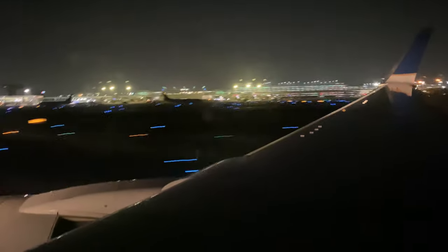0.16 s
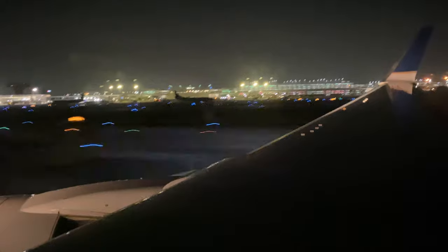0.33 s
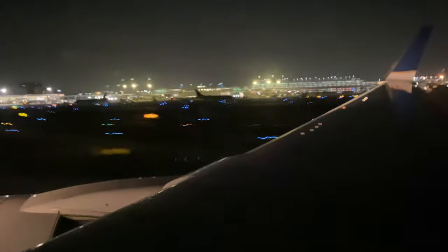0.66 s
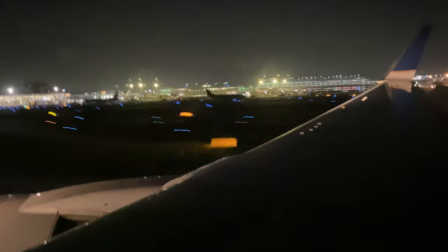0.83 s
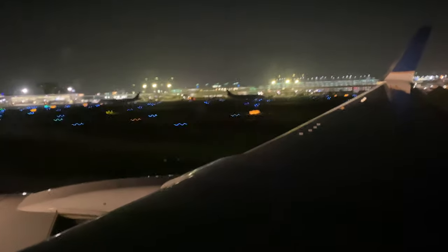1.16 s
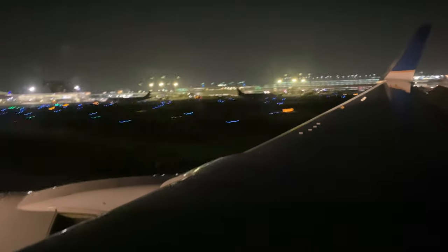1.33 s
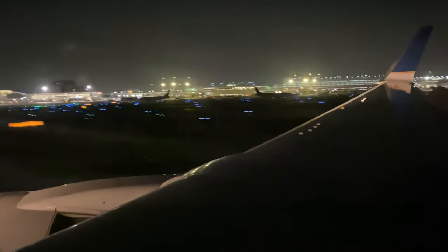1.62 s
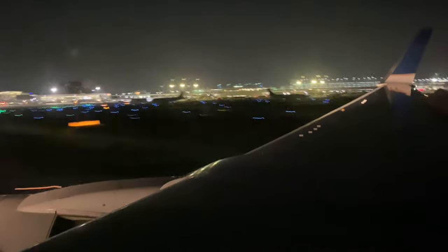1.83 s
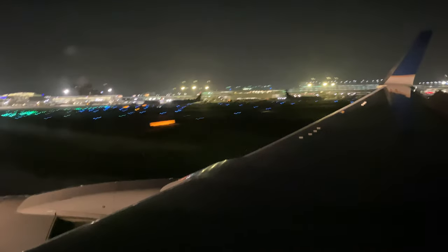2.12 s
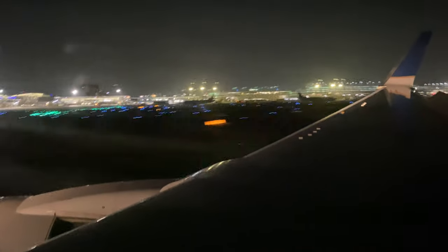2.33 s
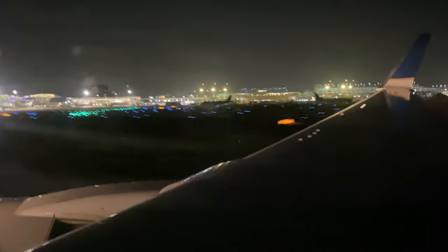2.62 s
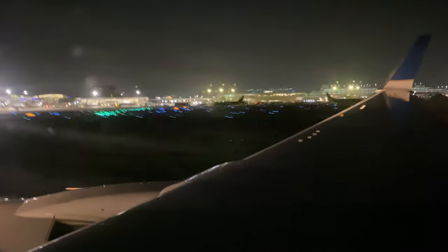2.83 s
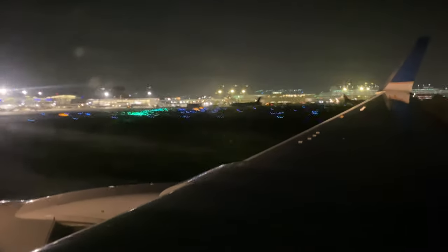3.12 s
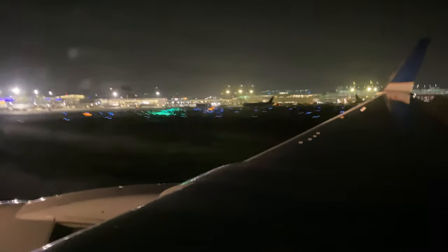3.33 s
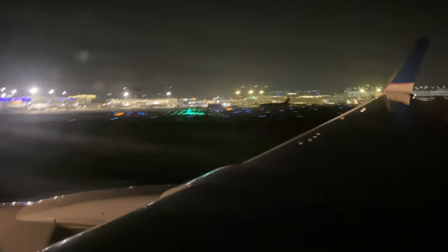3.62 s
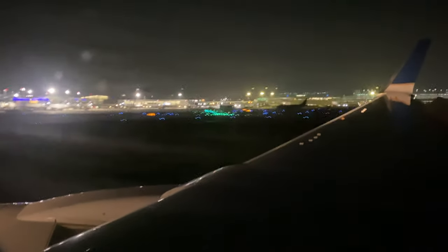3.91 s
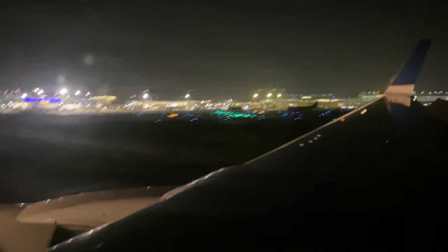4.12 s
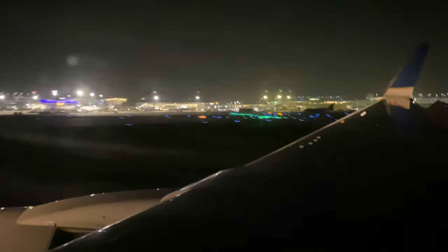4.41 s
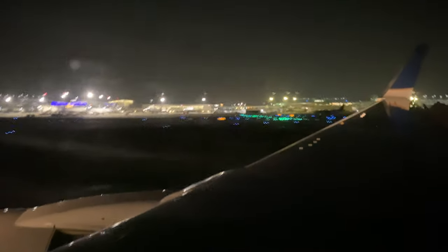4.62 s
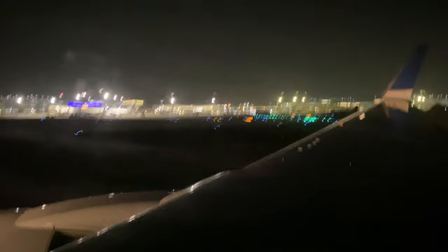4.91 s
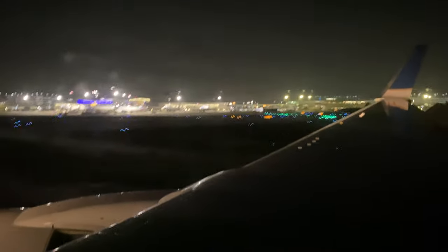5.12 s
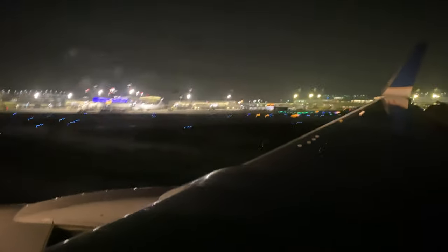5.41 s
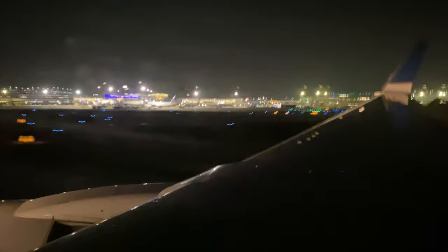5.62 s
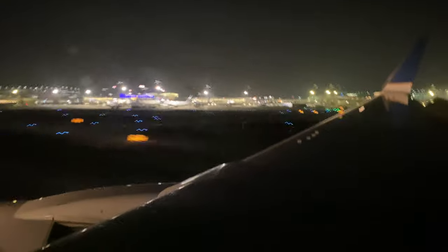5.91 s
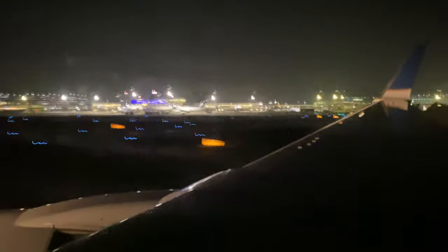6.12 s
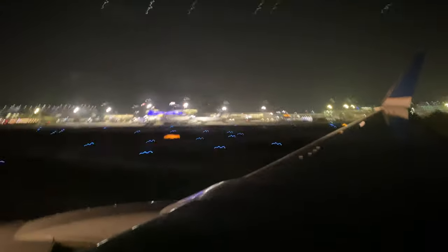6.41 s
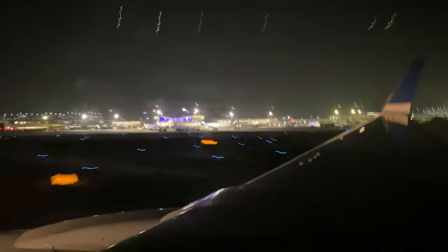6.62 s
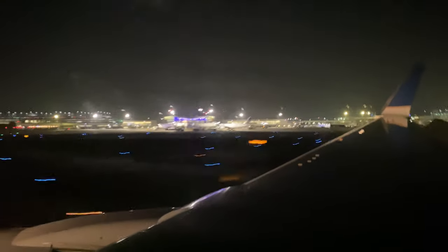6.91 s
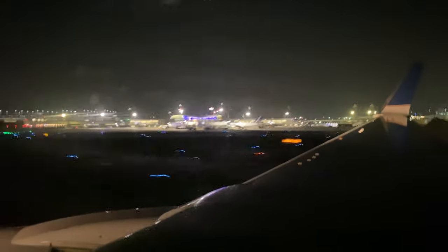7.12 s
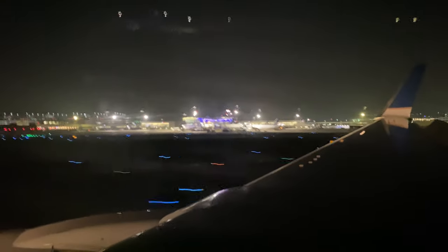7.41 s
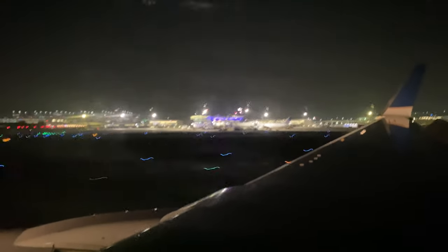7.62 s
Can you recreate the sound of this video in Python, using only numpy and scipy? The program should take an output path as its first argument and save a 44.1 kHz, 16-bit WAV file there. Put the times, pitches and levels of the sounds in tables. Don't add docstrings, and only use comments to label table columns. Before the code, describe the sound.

From a window seat in a passenger jet rolling down the runway at night, a low fuselage boom and wheel rumble run throughout. Reverse thrust swells the roar to a peak after about three seconds, then it eases unevenly. A thin hydraulic whine fades, while panels tick, rattle and knock over airy hiss. A handheld phone in the cabin picks it up in stereo, its bass peaks limited.

```python
import sys
import numpy as np
from scipy import signal
from scipy.fft import rfft, irfft, next_fast_len
from scipy.io import wavfile
from scipy.ndimage import uniform_filter1d, minimum_filter1d

SR = 44100
rng = np.random.default_rng(int(sys.argv[2]) if len(sys.argv) > 2 else 0)


def boost_factor(decibels):
    exponent = np.asarray(decibels, float) / 20
    return 10 ** exponent


def persist_wave(psi):
    counts = np.round(np.clip(psi, -1, 1) * 32767).astype(np.int16)
    wavfile.write(sys.argv[1], SR, np.atleast_2d(counts).T)


N = 341775
TIME_S = np.arange(N) / SR


def on_log_axis(hz, table, column=1):
    table = np.array(table, float)
    return np.interp(np.log(np.maximum(hz, 1)), np.log(table[:, 0]), table[:, column])


def curves(table):
    s, *columns = np.transpose(table)
    return [np.interp(TIME_S, s, column) for column in columns]


def walk(rate):
    hold = int(SR / rate)
    steps = np.repeat(rng.standard_normal(N // hold + 1), hold)
    return 1.3 * uniform_filter1d(uniform_filter1d(steps, hold), hold)[:N]


def ring(x, hz, width_hz):
    y = signal.lfilter(*signal.iirpeak(hz, hz / width_hz, fs=SR), x)
    return y / np.sqrt(np.mean(y ** 2))


def ramp(start_s, travel_s):
    return .5 + .5 * np.tanh(2 * (TIME_S - start_s) / travel_s)


def turbulence(colour, level_db, flicker_db, rate, modes=()):
    size = next_fast_len(N)
    hz = np.fft.rfftfreq(size, 1 / SR)
    lo, hi = colour[0][0], colour[-1][0]
    db = on_log_axis(hz, colour)
    for mode_hz, width_hz, mode_db in modes:
        db = db + mode_db / (1 + (2 * (hz - mode_hz) / width_hz) ** 2)
    below = np.maximum(lo / np.maximum(hz, 1), 1)
    db = db - 30 * np.log2(below * np.maximum(hz / hi, 1))
    spectrum = rfft(rng.standard_normal((2, size))) * boost_factor(db)
    octave = np.log2(np.maximum(hz, 1))
    out = 0
    for centre in np.arange(np.floor(np.log2(lo)) - 1, np.log2(hi) + 1, .5):
        share = np.clip(1 - 2 * abs(octave - centre), 0, 1)
        band = irfft(spectrum * share, size)[:, :N]
        out = out + band * boost_factor(flicker_db * walk(rate))
    return out / np.sqrt(np.mean(out ** 2)) * boost_factor(level_db)


# start_s, thrust_share (0-1)
ENGINE_THRUST = [(0, 0.03), (.3, 0.24), (1.2, 0.39), (2.0, 0.53), (2.7, .75), (3.35, 1), (3.55, 0.67),
                 (4.1, 0.86), (4.5, 0.67), (5.6, 0.65), (6.8, 0.39), (7.75, 0.5)]


def follow(idle_db, thrust_db, reverse_db, slow_db_per_s):
    doors = ramp(start_s=2.12, travel_s=.44)
    return idle_db + thrust_db * curves(ENGINE_THRUST)[0] + reverse_db * doors + slow_db_per_s * TIME_S


# frequency_hz, level_db per Hz
HISS_SPECTRUM = [(5500, -10.5), (6500, -2), (7500, -3), (9500, -4), (12000, -7.5), (13000, -11),
                 (15700, -11)]
# frequency_hz, width_hz, gain_db
VENT_DUCT_MODES = [(6930, 120, 5), (7900, 150, 4), (10600, 250, 3.5), (12200, 300, 1), (13920, 200, 7)]


def hiss(shudder_db):
    level_db = follow(idle_db=-49, thrust_db=1.7, reverse_db=.55, slow_db_per_s=-.53)
    level_db = level_db + shudder_db - 1.7 * ramp(start_s=3.48, travel_s=.05)
    return turbulence(HISS_SPECTRUM, level_db, flicker_db=.6, rate=32, modes=VENT_DUCT_MODES)


# frequency_hz, level_db per Hz
BUZZ_SPECTRUM = [(3200, -5.5), (3800, -2.5), (4400, -1), (4700, -5), (5100, -2), (5800, -5.5),
                 (6300, -10.5), (6900, -20)]


def buzz(shudder_db):
    level_db = follow(idle_db=-48, thrust_db=3.5, reverse_db=1, slow_db_per_s=-.1) + shudder_db
    return turbulence(BUZZ_SPECTRUM, level_db, flicker_db=-.3, rate=21)


def chatter():
    clicks_per_s, spread_db, smear_s = 300, 4, .0037
    size_db = spread_db * rng.exponential(size=(2, N)).clip(0, 4)
    hits = (rng.random((2, N)) < clicks_per_s / SR) * boost_factor(size_db)
    gate = signal.lfilter([1], [1, -np.exp(-1 / (smear_s * SR))], hits)
    band = signal.butter(2, [6000, 15000], "bandpass", fs=SR, output="sos")
    return boost_factor(-64.5 + 3 * walk(4.7)) * signal.sosfilt(band, gate * rng.standard_normal((2, N)))


def trim(events, trim_db, aisle_db=0):
    length = 4096
    t = np.arange(length) / SR
    out = np.zeros((2, N + length))
    for s, db, hz, width_hz, t60_s in events:
        noise = rng.standard_normal((2, length))
        scrape = ring(ring(noise, hz, width_hz), hz, width_hz)
        scrape = scrape / np.std(scrape[:, :SR // 50], axis=1, keepdims=True)
        shape = (1 - np.exp(-t / .0025)) * boost_factor(db + trim_db - 60 * t / t60_s)
        start = int(s * SR)
        out[:, start:start + length] += scrape * shape * boost_factor(np.array([[0], [aisle_db]]))
    return out[:, :N]


# start_s, peak_db
TICK_EVENTS = [(0.1585, -42), (0.7138, -39), (0.7397, -40), (1.0705, -46), (2.5396, -41), (2.9562, -44),
               (3.1547, -41.5), (3.455, -42), (3.8057, -42), (4.0627, -48), (4.6774, -51.5), (5.3482, -46),
               (6.2068, -43.5), (6.7406, -43), (6.917, -47)]


def ticks():
    hz, width_hz, t60_s = 10500, 5000, .031
    return trim([(s, db, hz, width_hz, t60_s) for s, db in TICK_EVENTS], trim_db=5)


# start_s, peak_db
RATTLE_EVENTS = [(0.5165, -35), (0.5877, -38), (0.6903, -32), (0.9054, -35), (1.3399, -34.5), (4.2443, -30),
                 (4.4704, -35), (4.816, -32), (4.969, -31), (5.4494, -35), (5.7219, -30), (6.1674, -32),
                 (6.5503, -35), (6.7434, -29), (7.6244, -30)]


def rattles():
    hz, width_hz, t60_s = 4500, 3100, .07
    return trim([(s, db, hz, width_hz, t60_s) for s, db in RATTLE_EVENTS], trim_db=-7, aisle_db=3)


# start_s, peak_db, centre_hz, width_hz, t60_s
KNOCK_EVENTS = [
    (.516, -27.5, 2600, 1800, .07),
    (.516, -22, 800, 900, .04),
    (.592, -32, 2800, 1500, .06),
    (2.286, -18, 650, 300, .05),
    (3.028, -22.5, 1900, 1700, .1),
    (3.295, -40, 14700, 2500, .02),
    (4.917, -19, 700, 500, .04),
    (7.62, -44, 5950, 200, .06),
]


def knocks():
    return trim(KNOCK_EVENTS, trim_db=0)


# start_s, peak_db, pitch_hz
PING_EVENTS = [
    (1.574, -28, 3280),
    (2.360, -34, 5750),
    (3.028, -15, 1440),
    (3.436, -28.5, 5780),
    (6.43, -38, 5800),
]


def pings():
    rise_s, t60_s = .006, .055
    out = np.zeros(N)
    for s, db, hz in PING_EVENTS:
        t = np.maximum(TIME_S - s, 0)
        shape = (1 - np.exp(-t / rise_s)) ** 2 * boost_factor(db - 60 * t / t60_s)
        out += shape * np.sqrt(2) * np.sin(2 * np.pi * hz * t)
    return out


# start_s, piston_rate_hz, level_db
PUMP_COURSE = [
    (0, 633, 0),
    (.6, 631.5, 0),
    (1.3, 633.5, -1),
    (1.9, 635, .5),
    (2.8, 634, .5),
    (3.3, 630, .5),
    (3.7, 629, -3),
    (4.5, 629, -6),
    (6, 629, -8),
    (7.75, 629, -14),
]
# multiple, left_db, right_db, right_lead_rad
PUMP_HARMONICS = [(2, -49, -50, 2.0), (3, -57, -64, -2.2), (4, -42, -56, .6), (5, -50, -50, -2.9),
                  (6, -61, -60, -.3), (7, -60, -58, -1.2), (8, -53, -59, -2.2), (9, -62, -58, -.8),
                  (14, -66, -66, 2.9), (15, -71, -71, 3.1)]


def pump():
    hz, db = curves(PUMP_COURSE)
    wobble = 1 + .0022 * walk(rate=14) + .007 * walk(rate=80)
    phase = 2 * np.pi * np.cumsum(hz * wobble) / SR
    out = np.zeros((2, N))
    for multiple, left_db, right_db, lead in PUMP_HARMONICS:
        flutter_db = 3.5 * walk(rate=60) + 3 * walk(rate=18)
        swing = np.sqrt(2) * boost_factor(db + np.minimum(flutter_db, 4))
        turn = round(multiple) * phase + 2 * np.pi * rng.random()
        out += swing * np.array([boost_factor(left_db) * np.sin(turn), boost_factor(right_db) * np.sin(turn + lead)])
    return out


# frequency_hz, level_db per Hz
ROAR_SPECTRUM = [(350, 1), (430, -2.5), (490, -4), (620, -3), (660, -6.5), (850, -8.5), (1150, -13),
                 (1300, -14), (1600, -17), (1800, -20), (2700, -22.5), (3100, -27), (3700, -32),
                 (4200, -42)]
# frequency_hz, width_hz, gain_db
WINDOW_GAP_MODES = [(2530, 250, 1), (1290, 110, 1.5)]


def roar(level_db):
    return turbulence(ROAR_SPECTRUM, level_db, flicker_db=.82, rate=10, modes=WINDOW_GAP_MODES)


def panel(roar_db):
    hum = ring(rng.standard_normal(N), hz=738, width_hz=50) * boost_factor(roar_db - 12)
    return np.array([hum, -.7 * hum])


# frequency_hz, level_db per Hz
WHEEL_SPECTRUM = [(95, -12.5), (112, -6), (128, -1.5), (160, -2.5), (195, -6), (220, -19.5)]


def wheels():
    level_db = follow(idle_db=-16.5, thrust_db=1.5, reverse_db=1.85, slow_db_per_s=.12)
    return turbulence(WHEEL_SPECTRUM, level_db, flicker_db=.5, rate=5.8)


# frequency_hz, level_db per Hz
RUMBLE_SPECTRUM = [(170, -21), (200, -3), (232, -4.5), (252, 0), (290, -3), (308, -0.5), (328, -3),
                   (345, -14.5), (415, -11.5), (435, -20.5), (470, -28)]
# frequency_hz, width_hz, gain_db
FLOOR_BEAM_MODE = [(320.2, 12, 3.5)]


def rumble():
    level_db = follow(idle_db=-20.5, thrust_db=4.5, reverse_db=3, slow_db_per_s=.22)
    return turbulence(RUMBLE_SPECTRUM, level_db, flicker_db=.3, rate=7.6, modes=FLOOR_BEAM_MODE)


# frequency_hz, level_db per Hz
BOOM_SPECTRUM = [(12, -48), (20, -28), (33, -17), (39, -12), (55, -4.5), (69, 1), (78, -12), (89, 1),
                 (108, -7), (125, -15)]


def boom():
    level_db = follow(idle_db=-11.5, thrust_db=1.5, reverse_db=-1, slow_db_per_s=-.06)
    return turbulence(BOOM_SPECTRUM, level_db, flicker_db=-.7, rate=10)


# frequency_hz, left_minus_right_db, likeness (0-1), right_lead_rad
PORT_PAIR = [(30, -.1, .993, -.03), (100, 0, .96, -.06), (320, 1, .93, -.15), (460, 0, .4, -.6),
             (720, 5, .3, -.8), (1200, 0, .25, -.6), (2000, 3, .2, -2.2), (2350, 4, .2, -.2),
             (2650, 4.5, .7, -.5), (3300, 4.5, .4, -1.1), (3900, 2.5, .6, -.1), (4900, 4, .25, -.2),
             (5600, 1, .1, -.5), (6400, 0, .3, 0)]


def ports(field):
    treble_from_hz, treble_pure_hz = 6500, 8500
    lag_s, in_phase_hz = .000241, 6990
    edge = SR // 10
    field = np.pad(field, ((0, 0), (edge, edge)), "reflect")
    size = next_fast_len(field.shape[1])
    hz = np.fft.rfftfreq(size, 1 / SR)
    treble = np.clip((hz - treble_from_hz) / 500 + .5, 0, 1)
    treble_like = np.interp(hz, [treble_from_hz, treble_pure_hz], [.9, .98])
    like = on_log_axis(hz, PORT_PAIR, column=2) * (1 - treble) + treble_like * treble
    like = np.clip(like, 0, 1)
    treble_lead = 2 * np.pi * lag_s * (hz - in_phase_hz)
    lead = np.where(treble > 0, treble_lead, on_log_axis(hz, PORT_PAIR, column=3))
    pan = boost_factor(on_log_axis(hz, PORT_PAIR) / 2)
    shared, other = rfft(field, size)
    right = like * np.exp(1j * lead) * shared + np.sqrt(1 - like ** 2) * other
    return irfft(np.array([shared * pan, right / pan]), size)[:, edge:edge + N]


def scene():
    shudder_db = .76 * walk(rate=55)
    roar_db = follow(idle_db=-25.5, thrust_db=4.5, reverse_db=.4, slow_db_per_s=-.007) + .5 * shudder_db
    field = hiss(shudder_db) + buzz(shudder_db) + chatter()
    field += ticks() + rattles() + knocks()
    field += roar(roar_db) + wheels() + rumble() + boom()
    return ports(field) + pump() + panel(roar_db) + pings()


def top_cut(x):
    return signal.sosfilt(signal.butter(12, 16450, fs=SR, output="sos"), x)


def record(dry):
    limit, hold_s = .93, .0029
    fade_in_s, fade_out_s = .001, .006
    hold = int(hold_s * SR)
    gain = np.minimum(1, limit / (abs(dry).max(axis=0) + 1e-9))
    gain = uniform_filter1d(minimum_filter1d(gain, hold), hold)
    gain = gain * np.sin(np.pi / 2 * np.clip(TIME_S[::-1] / fade_out_s, 0, 1)) ** 2
    gain = gain * np.clip(TIME_S / fade_in_s, 0, 1)
    low_pass = signal.ellip(12, .2, 80, 15700, fs=SR, output="sos")
    return top_cut(signal.sosfilt(low_pass, dry * gain))


dry = scene()
out = record(dry)
persist_wave(out)
```